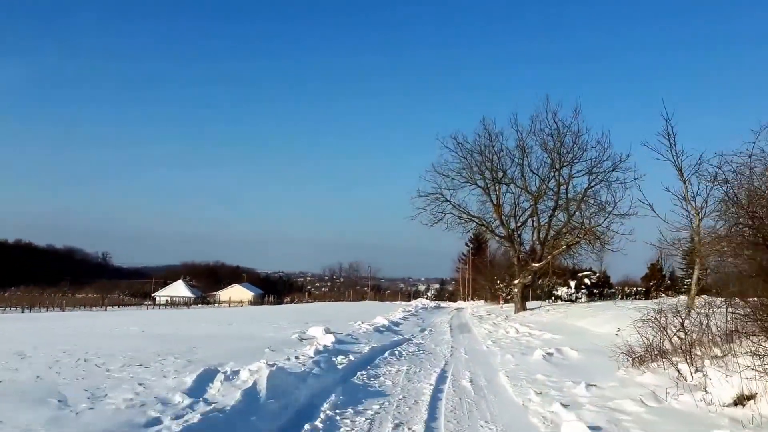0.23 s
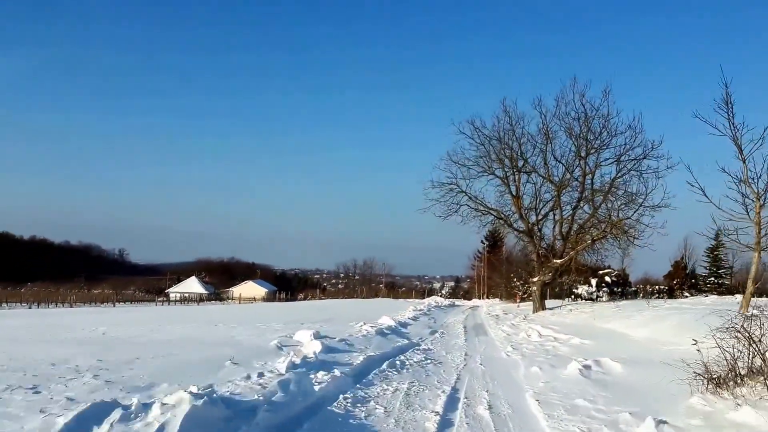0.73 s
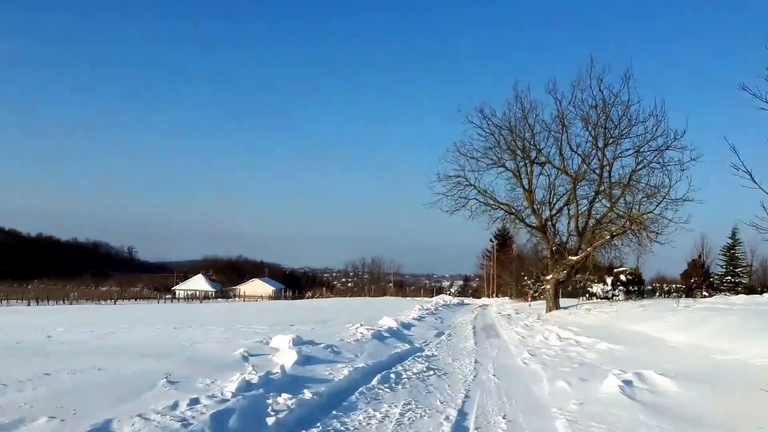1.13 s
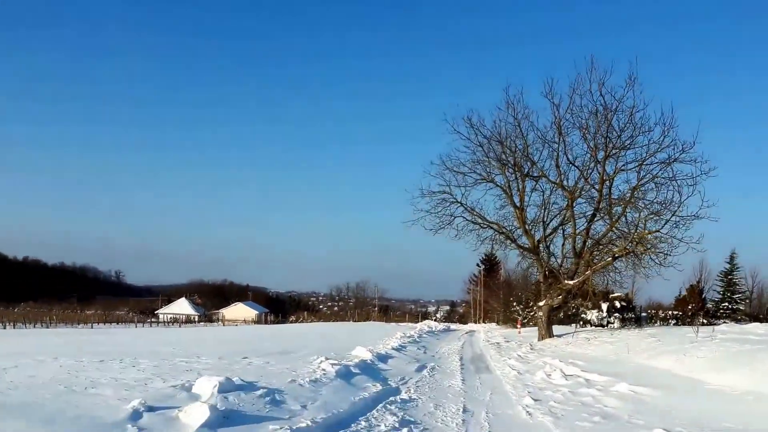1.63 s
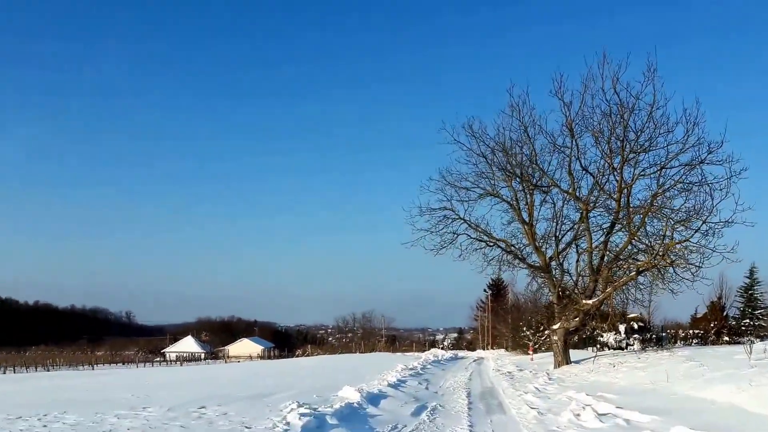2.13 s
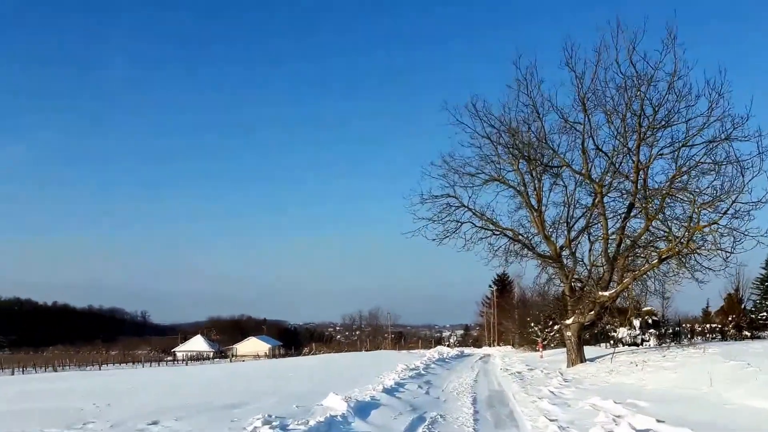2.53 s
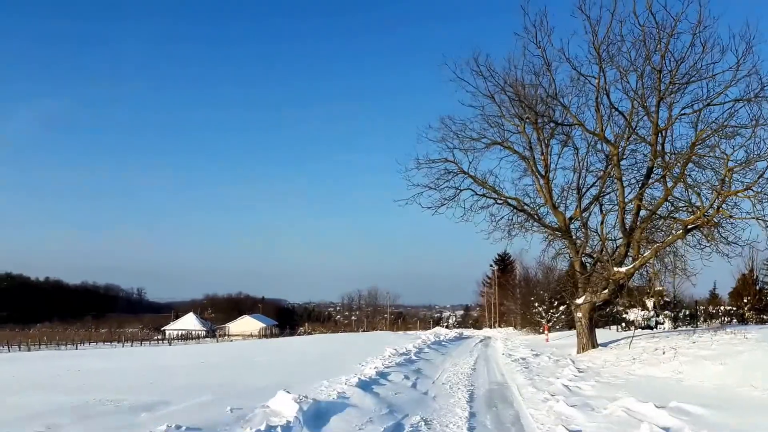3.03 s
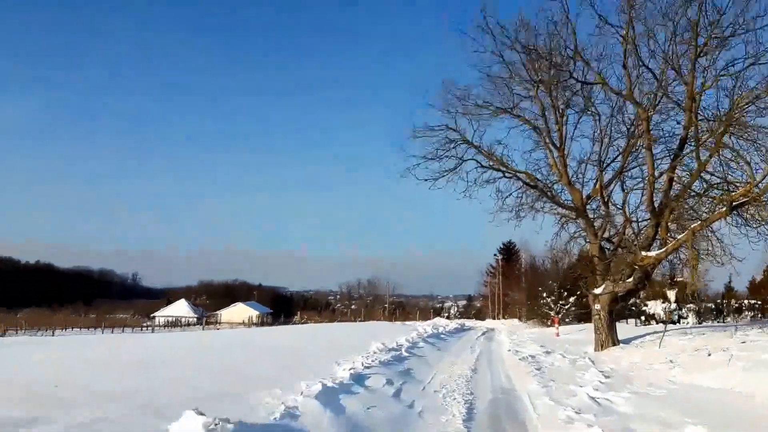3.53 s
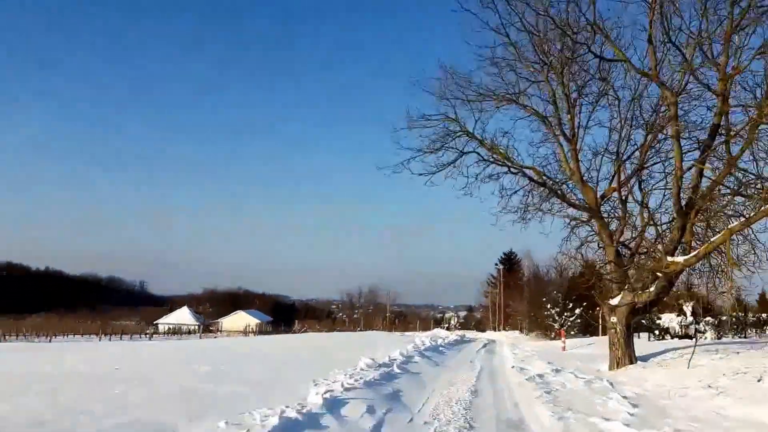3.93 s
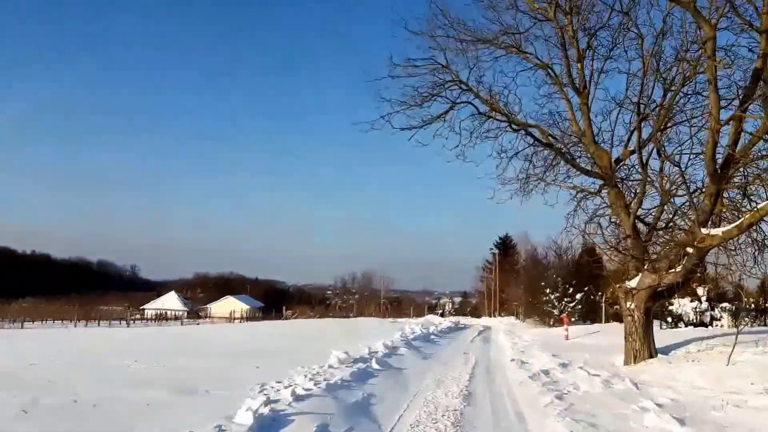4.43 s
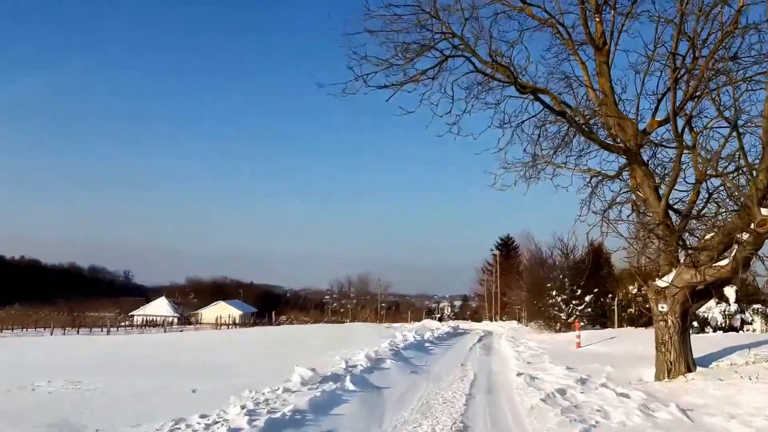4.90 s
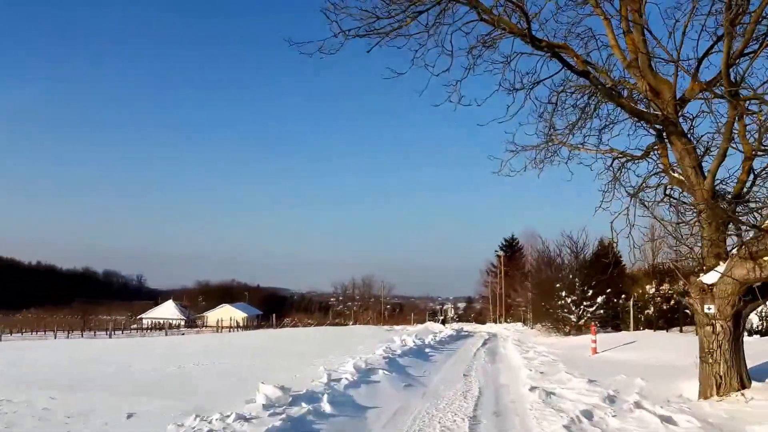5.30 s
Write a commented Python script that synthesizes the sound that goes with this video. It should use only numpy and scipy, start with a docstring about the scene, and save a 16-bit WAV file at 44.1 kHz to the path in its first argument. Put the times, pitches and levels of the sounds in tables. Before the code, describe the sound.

A small vehicle drives steadily along packed snow in open country, heard on board in close stereo. Throughout, a low, rough engine drone near 48 hertz wavers slightly without clear gear changes, mixed with lumpy bass rumble from wind and track and a faint drivetrain hum. From 0 to about 3.3 seconds the bass swells in dense, uneven surges with drumming tread roar, broken by brief dips in the first half second. Tyres crunch continuously, grainy and dull; crust snaps and crumbles sharply at the start, then busily from 0.75 to 1.9 seconds, with a cluster near 2.45. After 3.3 seconds the rumble thins to a calmer drone, with two short bumps around 3.5 and scattered soft cracks. A quick double knock on a panel comes at 4.17, bright ice ticks at 4.5 and 5.05, and a last short surge at 5.05. Thin, fluttering air hiss stays faint until 5.5 seconds.

```python
"""Small vehicle on packed snow

A small three-cylinder vehicle rolls along packed snow, heard from on board. Engine orders at about 2000 rpm
and shaped noise for wind, track and treads come in surges: dense for three seconds, then sparse.
Random fractures make the tyre crunch and breaking crust; decaying modes knock on a panel; noise hisses as air."""
import sys
import numpy as np
from scipy import signal
from scipy.fft import rfft, irfft
from scipy.io import wavfile
from scipy.ndimage import uniform_filter1d

SR = 44100
rng = np.random.default_rng(int(sys.argv[2]) if len(sys.argv) > 2 else 0)


def bounce(signal):
    """Save signal as a 16-bit WAV file at the path given by the first command-line argument."""
    frames = np.transpose(np.atleast_2d(signal))
    limited = np.clip(frames, -1, 1)
    pcm = np.round(limited * 32767).astype(np.int16)
    wavfile.write(sys.argv[1], SR, pcm)


N = 245195


# Engine speed: time_s, firings_per_s
ENGINE_SPEED = [(0.0, 49.8), (0.3, 47), (0.6, 49.5), (1.0, 43), (1.35, 48.8), (1.6, 46.6), (2.0, 49.8),
                (2.4, 46.7), (2.8, 48.6), (3.2, 49.9), (3.6, 47.49), (4.0, 44.2), (4.4, 49), (4.8, 49.2),
                (5.2, 50), (5.55, 45.3)]


def engine_cycles():
    """Four-stroke cycles run so far; three cylinders fire once each per cycle."""
    firings_per_s, = in_time(ENGINE_SPEED)
    return np.cumsum(firings_per_s) / (3 * SR)


# Exhaust tones: order_per_cycle, relative_db
EXHAUST_ORDERS = [(2, -24), (3, 0.5), (4, -3), (6, -11.5), (7, -13.5), (8, -21.5), (9, -13.5), (10, -14),
                  (11, -21), (12, -18), (15, -30.5), (18, -30.5)]
TONE_DB, TONE_SURGE_DB, DRONE_SURGE_DB = -36.5, 8, 8.5  # base level; gains in a full surge
LULL_SHARE = 0.25  # part of each lull, in dB, that reaches drone and rumble
FIRING_ORDER, DRONE_FROM_ORDER = 3, 6
WAVER_DB, PHASE_WAVER_RAD = 1.2, 0.55


def exhaust(boom, drone):
    """Sines at engine orders: the firing tone holds its phase, the rest waver; order 6 and up is the drone."""
    cycles = engine_cycles()
    tone_db = TONE_DB + lifted_db(boom, TONE_SURGE_DB) + lulls_db()
    drone_db = TONE_DB + lifted_db(drone, DRONE_SURGE_DB) + LULL_SHARE * lulls_db()
    out = np.zeros(N)
    for order, db in EXHAUST_ORDERS:
        angle = 2 * np.pi * order * cycles
        if order == FIRING_ORDER:
            waver_db = WAVER_DB * drift(20)
        else:
            waver_db = WAVER_DB * drift(4.6)
            angle = angle + rng.uniform(0, 2 * np.pi) + PHASE_WAVER_RAD * drift(2.2)
        level_db = drone_db if order >= DRONE_FROM_ORDER else tone_db
        out += from_db(level_db + db + waver_db) * np.sin(angle)
    return np.sqrt(2) * out  # rms 1 per sine at 0 dB


# Surges, levels against a full surge: start_s, length_s, firing_tone_db, rumble_db, drone_db
BOOM_SURGES = [(0.0, 0.1, -2.5, 1.5, 3.5), (0.129, 0.11, -3, -.5, 4.5), (0.29, 0.11, -16, -13, 0),
               (0.335, 0.017, -3, 3, -7), (0.446, 0.026, 4, 2.5, 7.5), (0.516, 0.13, -0.5, -0.5, 7),
               (0.669, 0.15, 5, 0, -2.5), (0.829, 0.14, -2, 4.5, 8), (0.99, 0.16, -4, 4, 0),
               (1.18, 0.074, -5, -1.5, -3), (1.251, 0.39, -1, 4.5, 1.5), (1.67, 0.27, 5, 3, 5.5),
               (1.955, 0.084, -17, -1, 1.5), (2.039, 1.22, -1, 2.7, 0.5), (3.428, 0.094, 0, -0.5, 2.5),
               (3.594, 0.021, 2, -3, 0), (5.05, 0.17, 1.5, -1, 6)]
SURGE_ATTACK_S, SURGE_RELEASE_S = 0.0042, 0.018


def surge():
    """Strength of firing tone, rumble and drone: 0 at rest, 1 in a full surge; quick attack, hold, release."""
    t = np.arange(N) / SR
    strength = np.zeros((3, N))
    for start_s, length_s, *levels_db in BOOM_SURGES:
        attack = np.clip((t - start_s) / SURGE_ATTACK_S, 0, 1)
        release = np.clip(1 - (t - start_s - length_s) / SURGE_RELEASE_S, 0, 1)
        strength = np.maximum(strength, np.outer(from_db(levels_db), attack * release))
    return strength


def lifted_db(strength, full_db):
    """Level gained by a surge of this strength."""
    return 20 * np.log10(1 + strength * (from_db(full_db) - 1))


# Slackenings of the engine note: centre_s, change_db, gaussian_width_s
ENGINE_LULLS = [(0.114, -6, 0.013), (0.3, 0, 0.03), (0.42, -5, 0.019), (0.494, -15, 0.011),
                (3.377, -5.5, 0.044)]


def lulls_db():
    """Each lull is a short, smooth dip in the engine note."""
    t = np.arange(N) / SR
    return sum(db * np.exp(-((t - s) / width_s) ** 2) for s, db, width_s in ENGINE_LULLS)


RUMBLE_DB, RUMBLE_SURGE_DB = -40, 8.5


def rumble_level_db(heave):
    """Level shared by rumble and hum: base, surges and a share of the lulls."""
    return RUMBLE_DB + lifted_db(heave, RUMBLE_SURGE_DB) + LULL_SHARE * lulls_db()


# Rumble of wind and track, spectral shape: pitch_hz, relative_db
RUMBLE_SPECTRUM = [(12, -20), (22, -25), (35, -10), (62, 10), (88, 0), (150, 0.5), (210, -2), (260, -10.5),
                   (400, -18.5), (520, -29), (900, -55), (2500, -86)]
# Left-right likeness of the rumble noise: pitch_hz, likeness_0_to_1
RUMBLE_ALIKE = [(60, .995), (120, .965), (220, .95), (410, .75)]


def rumble():
    """Lumpy buffeting: noise nearly the same on both sides in the bass."""
    alike = np.clip(over_hz(RUMBLE_ALIKE, N)[0], 0, 1)
    mid, side = rfft(rng.standard_normal((2, N)))
    opposite = np.array([[1], [-1]])
    pair = np.sqrt(1 + alike) * mid + opposite * np.sqrt(1 - alike) * side
    buffeting = even(colour(irfft(pair, N), RUMBLE_SPECTRUM), share=0.49)
    return buffeting * from_db(1.5 * drift(39.0))


# Drivetrain hum, level against the rumble: pitch_hz, width_hz_per_pass, level_db
HUM_BANDS = [(214.5, 12, -18), (246.6, 8.9, -28), (427.5, 34.5, -20)]


def hum():
    """The drivetrain hums unsteadily: noise passed twice through each narrow resonance."""
    out = np.zeros(N)
    for pitch_hz, width_hz, db in HUM_BANDS:
        once = resonate(rng.standard_normal(N), pitch_hz, width_hz)
        out += from_db(db) * rms_one(resonate(once, pitch_hz, width_hz))
    return out


# Tread roar, spectral shape: pitch_hz, relative_db
ROAR_SPECTRUM = [(150, -26), (280, 3), (350, 7), (430, 2), (520, -5), (900, -46.5)]
ROAR_DB, ROAR_SIDE_DB = -50, -2  # level in a full surge; independent part against the shared part


def roar(heave):
    """The treads drum unevenly on the rutted track during surges."""
    apart = rng.standard_normal((2, N)) * from_db(ROAR_SIDE_DB)
    shared = rng.standard_normal(N)
    return from_db(ROAR_DB) * heave * colour(apart + shared, ROAR_SPECTRUM) * from_db(1.5 * drift(14.7))


# Place of the bass: pitch_hz, left_minus_right_db, left_lead_rad
BASS_SIDES = [(50, -4, .33), (140, -3, 0.62), (180, -2.5, 0.51), (223, -5, 0.87), (420, 3.5, 1.05)]


def place_bass(pair):
    """Below about 300 Hz the right is stronger, but the left leads in phase."""
    lean_db, lead_rad = over_hz(BASS_SIDES, N)
    half = np.array([[1], [-1]]) / 2
    return irfft(rfft(pair) * from_db(half * lean_db) * np.exp(1j * half * lead_rad), N)


# Tyre crunch before its gain: time_s, relative_db
CRUNCH_LEVEL = [(0.0, -48.5), (0.37, -54.5), (0.76, -53.5), (0.95, -51), (1.64, -51), (1.89, -53),
                (3.36, -54), (5.05, -53), (5.56, -54)]
# Snow under the tyres, filter shape: pitch_hz, left_db, right_db
SNOW_SPECTRUM = [(115, -37, -48), (300, -0.5, 2.5), (446, 3.5, -3), (489, -2, -9), (853, -6.5, -20),
                 (1010, -4, -14), (1300, -9, -14), (1660, -11.5, -14), (2166, -17, -27.5),
                 (3610, -28.5, -53), (5360, -39.5, -40), (7000, -43, -55), (16000, -80, -42)]
CRUNCH_GAIN_DB, CLUMP_DB, PATCH_DB = 5.5, 1.1, 0.7


def tyres():
    """Packed snow gives way in clumps of tiny fractures, with harder and softer patches."""
    crunch_db, = in_time(CRUNCH_LEVEL)
    cracks = grains(N, per_s=140, spread_db=2.9, sharpness=10) * from_db(CLUMP_DB * drift(45))
    patchy = cracks * from_db(PATCH_DB * drift(1.7))
    return from_db(crunch_db + CRUNCH_GAIN_DB) * colour(patchy, SNOW_SPECTRUM)


# Lumps of crust crushed by a tyre: start_s, level_db, decay_s, tilt_db_per_octave, pitch_hz
CRUST_LUMPS = [(0.008, -33, 0.0081, -14, 1300), (0.022, -37.5, 0.042, -3, 770),
               (0.046, -40.5, 0.012, -3.5, 1400), (0.072, -58, 0.054, -4, 780),
               (0.293, -41.5, 0.03, 0, 1100), (0.335, -49, 0.16, -2.5, 1090),
               (0.749, -38, 0.009, -8.5, 1490), (0.806, -41, 0.037, -5, 1030),
               (0.858, -38.5, 0.016, -1, 645), (0.872, -40, 0.015, 0.5, 647), (0.889, -48, 0.018, 2, 3200),
               (0.901, -37, 0.018, -6, 1400), (0.928, -34.5, 0.01, -7, 1430),
               (0.991, -40, 0.025, -4.5, 1300), (1.042, -43.5, 0.044, -5, 940),
               (1.103, -41, 0.0078, -5, 895), (1.143, -46, 0.019, -1, 1010),
               (1.173, -39, 0.016, -3.5, 2280), (1.192, -41, 0.016, -8, 1000),
               (1.215, -45, 0.023, -1.5, 3300), (1.326, -44, 0.017, -5, 589.3), (1.35, -43, 0.018, -3, 630),
               (1.41, -53, 0.013, 2, 1000), (1.47, -41, 0.016, -2, 1500), (1.506, -35, 0.0069, -1.5, 696),
               (1.519, -38, 0.0071, -7, 884), (1.534, -48, 0.019, 2, 1000), (1.555, -46, 0.008, 0, 1700),
               (1.571, -39, 0.013, 2, 910), (1.59, -36, 0.018, -4, 2990), (1.601, -39, 0.023, -5, 1491),
               (1.669, -44.5, 0.044, -5, 1560), (1.684, -46, 0.029, 1, 2915), (1.698, -46, 0.017, 3, 1400),
               (1.75, -48.5, 0.035, 0.5, 1800), (1.829, -48, 0.008, -1, 997),
               (1.91, -38.5, 0.012, -9.5, 1205), (2.19, -50, 0.0078, -3, 900), (2.213, -50, 0.02, 1, 1595),
               (2.419, -45, 0.024, -4.5, 1002), (2.441, -38.5, 0.026, -5.5, 1509),
               (2.467, -44, 0.016, -3.5, 951.6), (2.489, -44.5, 0.008, -3.5, 1000),
               (2.531, -46.5, 0.0073, 1, 931), (2.713, -45, 0.0088, -8, 700),
               (2.912, -45.5, 0.028, -5, 1609), (2.938, -44, 0.014, -7, 1400),
               (3.085, -42.5, 0.036, -5, 1470), (3.147, -47, 0.01, -9, 710), (3.609, -54, 0.008, 3, 799.8),
               (3.739, -52, 0.0079, -5, 700), (3.777, -47.5, 0.013, -2, 700),
               (3.938, -41.5, 0.0085, -11, 800), (4.021, -45, 0.009, -10, 1011),
               (4.168, -43, 0.028, 0.5, 1000), (4.335, -45, 0.0067, -2.5, 930),
               (4.628, -44, 0.012, -2.5, 1485), (4.69, -46, 0.011, 0, 852.5), (4.742, -44, 0.0086, -8, 892),
               (4.833, -48.5, 0.007, 0, 1222)]


def big_lumps():
    """Big lumps break with a snap a little louder than usual."""
    return bursts(CRUST_LUMPS, per_s=230, snap_db=1)


SMALL_LUMPS_PER_S, SMALL_LUMP_DB, SMALL_LUMP_SPREAD_DB = 4, -52, 2.5
SMALL_LUMP_DECAY_S, SMALL_LUMP_TILT_DB_PER_OCTAVE, SMALL_LUMP_HZ = 0.011, -11, 1400


def small_lumps(count=40):
    """Small lumps break at random along the track, with exponential gaps."""
    chance = rng.random((count, 2))
    times_s = np.cumsum(-np.log(1 - chance[:, 0])) / SMALL_LUMPS_PER_S
    levels_db = SMALL_LUMP_DB + SMALL_LUMP_SPREAD_DB * (2 * chance[:, 1] - 1)
    rows = [(s, db, SMALL_LUMP_DECAY_S, SMALL_LUMP_TILT_DB_PER_OCTAVE, SMALL_LUMP_HZ)
            for s, db in zip(times_s, levels_db) if s < (N - 1) / SR]
    return bursts(rows, per_s=200, snap_db=-3)


# Ice crumbs flicked at the body, before gain: start_s, relative_db, decay_s, tilt_db_per_octave, pitch_hz
ICE_CRUMBS = [(0.744, -52, .012, 6, 8000), (1.173, -45, .016, 5.5, 8300), (1.556, -47, .014, 5, 8000),
              (4.532, -44.5, .005, 7, 13500), (5.047, -49, .007, 6, 10500)]
CRUMB_GAIN_DB = -3.5


def crumbs():
    """Ice crumbs hit the body as bright, dense showers with hardly any snap."""
    return from_db(CRUMB_GAIN_DB) * bursts(ICE_CRUMBS, per_s=600, snap_db=-14)


# Breaking crust, filter shape before tilt: pitch_hz, left_db, right_db
CRUST_SPECTRUM = [(147, 16, 9), (443, 4.5, 5.5), (900, 7.5, -10), (1630, 4.5, 5), (2050, 3, -12.5),
                  (2360, -12, -42), (3250, -5, -23), (4180, -16.5, -17), (5240, -18, -13.5),
                  (7000, -28.5, -69), (16000, -45, -49)]
SNAP_DECAY_S, SHOWER_ATTACK_S, SHOWER_DB = 0.009, 0.0015, -0.7
PITCH_DB, PITCH_SHARPNESS = 3, 2.6  # resonance added to the plain crackle


def bursts(rows, per_s, snap_db):
    """Each piece snaps and collapses in a short shower of fractures gathered round its own pitch."""
    out = np.zeros((2, N))
    t = np.arange(SR // 10) / SR
    for start_s, db, decay_s, tilt_db, pitch_hz in rows:
        spectrum = [(hz, left + tilt_db * np.log2(hz), right + tilt_db * np.log2(hz))
                    for hz, left, right in CRUST_SPECTRUM]
        snap_envelope = np.exp(-(t / SNAP_DECAY_S) ** 2)
        shower_envelope = np.exp(-(t / decay_s) ** 2) * np.minimum(t / SHOWER_ATTACK_S, 1)
        shower = grains(len(t), per_s, spread_db=3.0, sharpness=8)
        parts = [(snap(len(t), width_hz=100), snap_db, snap_envelope),
                 (shower, SHOWER_DB, shower_envelope)]
        start = max(round(start_s * SR), 0)
        for sound, part_db, envelope in parts:
            ringing = resonate(sound, pitch_hz, pitch_hz / PITCH_SHARPNESS)
            sound = colour(sound + from_db(PITCH_DB) * ringing, spectrum)
            sound = rms_one(sound * envelope) * np.sqrt(np.mean(envelope ** 2))
            out[:, start:start + len(t)] += from_db(db + part_db) * sound[:, :N - start]
    return out


def snap(size, width_hz, count=20):
    """One dull break sets all the low pitches ringing at once."""
    click = signal.unit_impulse(size)
    pitches_hz = np.geomspace(450, 2600, count)
    return sum(rng.normal() * resonate(click, hz, width_hz) for hz in pitches_hz)


def grains(size, per_s, spread_db, sharpness, shared_hz=650, count=40):
    """Tiny fractures, mostly weak, each ringing at its own pitch; bright ones are more common."""
    pair = np.zeros((2, size))
    for hz in np.geomspace(250, 16000, count):
        born = rng.random((2, size)) < per_s * np.sqrt(hz / 1000) / SR  # per_s holds at 1 kHz
        strength_db = spread_db * np.minimum(rng.exponential(1, born.sum()), 4)
        clicks = np.zeros((2, size))
        clicks[born] = from_db(strength_db) * rng.choice([-1, 1], born.sum())
        pair += resonate(clicks, hz, hz / sharpness)
    left, right = rfft(pair)
    bins_hz = np.arange(len(left)) * SR / size
    alike = 1 / (1 + (bins_hz / shared_hz) ** 2)  # long waves reach both sides alike
    right = alike * left + np.sqrt(1 - alike ** 2) * right
    return rms_one(irfft([left, right], size))


# Strikes of a hard lump: start_s, level_db
PANEL_KNOCKS = [(4.168, -46), (4.177, -40.5)]
# Modes of the panel: pitch_hz, relative_db, t60_s
PANEL_MODES = [(900, -4, 0.029), (1550, 0, 0.07), (2010, -9, .06), (2580, -9, .05), (3700, -19, .04)]
KNOCK_LEFT_MINUS_RIGHT_DB = 4


def knocks():
    """A hard lump strikes a panel and rebounds; the panel modes ring briefly."""
    out = np.zeros(N)
    for start_s, db in PANEL_KNOCKS:
        start = round(start_s * SR)
        t = np.arange(N - start) / SR
        for hz, mode_db, t60_s in PANEL_MODES:
            decay_db = -60 * np.minimum(t / t60_s, 5)
            out[start:] += from_db(db + mode_db + decay_db) * np.sin(2 * np.pi * hz * t)
    return out * from_db(np.array([[1], [-1]]) * KNOCK_LEFT_MINUS_RIGHT_DB / 2)


# Hiss before its gain: time_s, relative_db
HISS_LEVEL = [(0.01, -60.5), (0.17, -64.5), (0.29, -67), (0.39, -63.5), (0.71, -70), (0.87, -61.5),
              (0.99, -65), (1.37, -64), (1.57, -58), (1.75, -66), (2.35, -62), (2.43, -66.5), (2.83, -64.5),
              (2.91, -67), (3.15, -63.5), (3.25, -67.5), (4.31, -64.5), (5.53, -67)]
# Airflow, spectral shape: pitch_hz, left_db, right_db
AIR_SPECTRUM = [(1030, -36, 21.5), (4430, 9.5, 10.5), (5700, 5.5, 9.5), (6930, 7, -8), (8000, 2, -10),
                (9700, 3, -25), (11500, 8.5, -5.5), (15600, 5, -2.5)]
HISS_GAIN_DB, FLUTTER_DB = 6.0, 1.5


def airflow():
    """Airflow is a thin noise hiss that flutters, independent on each side."""
    hiss_db, = in_time(HISS_LEVEL)
    hiss = colour(rng.standard_normal((2, N)), AIR_SPECTRUM)
    return from_db(hiss_db + HISS_GAIN_DB) * hiss * from_db(FLUTTER_DB * drift(22))


# Hollow resonances of the bodywork, added to the direct sound: pitch_hz, width_hz, left_db, right_db
BODY_HOLLOWS = [(597.6, 36, 0.5, -23), (667, 15, -7.5, 4), (925, 9.3, 3.5, -12), (1586, 25, -23, -26),
                (1830, 94, -37, -1.5), (2256, 26, 2, -2), (2900, 84, -18, -17), (4060, 120, -11, -9),
                (8040, 590, 4.5, -20)]


def bodywork(outside):
    """Hollows in the bodywork ring along with snow, air and knocks."""
    ringing = np.zeros((2, N))
    for hz, width_hz, left_db, right_db in BODY_HOLLOWS:
        ringing += from_db([[left_db], [right_db]]) * resonate(outside, hz, width_hz)
    return outside + ringing


def from_db(db):
    """Decibels to gain."""
    return 10 ** (np.asarray(db) / 20)


def rms_one(x):
    """Scale to unit power."""
    return x / np.sqrt(np.mean(x ** 2) + 1e-20)


def in_time(rows):
    """One curve per column, at every sample."""
    s, *columns = np.transpose(rows)
    return [np.interp(np.arange(N) / SR, s, c) for c in columns]


def over_hz(rows, size):
    """Table columns at the bins of a spectrum, joined on a log axis."""
    hz, *columns = np.transpose(rows)
    bins_hz = np.maximum(np.arange(size // 2 + 1) * SR / size, 1)
    return np.array([np.interp(np.log(bins_hz), np.log(hz), c) for c in columns])


def colour(x, spectrum):
    """Filter to a spectral shape, one or two sides; rms 1."""
    size = x.shape[-1]
    return rms_one(irfft(rfft(x) * from_db(over_hz(spectrum, size)), size))


def drift(rate_hz):
    """Slow chance with spread 1: low-passed noise, drawn every 40 samples."""
    r = np.exp(-80 * np.pi * rate_hz / SR)
    slow = signal.lfilter([1], [1, -2 * r, r * r], rng.standard_normal(N // 40 + 2002))
    slow = slow[2000:]  # drop the filter's start-up
    return np.interp(np.arange(N) / 40, np.arange(len(slow)), rms_one(slow))


def resonate(x, hz, width_hz):
    """Two-pole resonance with gain 1 on top."""
    r = np.exp(-np.pi * width_hz / SR)
    zeros = np.array([1, 0, -1]) * (1 - r * r) / 2
    poles = [1, -2 * r * np.cos(2 * np.pi * hz / SR), r * r]
    return signal.lfilter(zeros, poles, x + 1e-18)


def even(x, share, size=1400):
    """Take out a share of the swings in power slower than about 30 ms."""
    power = uniform_filter1d(uniform_filter1d(np.mean(x ** 2, axis=0), size), size)
    return rms_one(x / (power + 1e-12) ** (np.clip(share, 0, 1) / 2))


RIGHT_LAG_S = 0.0003  # snow, air and knocks arrive later on the right


def scene():
    """Engine, rumble and roar make the bass; snow, air and knocks pass the bodywork."""
    boom, heave, drone = surge()
    low = exhaust(boom, drone) + from_db(rumble_level_db(heave)) * (rumble() + hum())
    low += roar(heave)
    snow = tyres() + big_lumps() + small_lumps() + crumbs()
    left, right = bodywork(snow + knocks() + airflow())
    samples = np.arange(N)
    late_right = np.interp(samples - round(RIGHT_LAG_S * SR), samples, right)
    return place_bass(low) + np.array([left, late_right])


CUTOFF_HZ = 15900


def record(dry):
    """Soften the ends and cut the top steeply."""
    ends = signal.windows.tukey(N, .002)
    low_pass = signal.ellip(10, .2, 70, CUTOFF_HZ, fs=SR, output="sos")  # ripple dB, stopband dB
    return signal.sosfilt(low_pass, dry * ends)


dry = scene()
out = record(dry)
bounce(out)
```